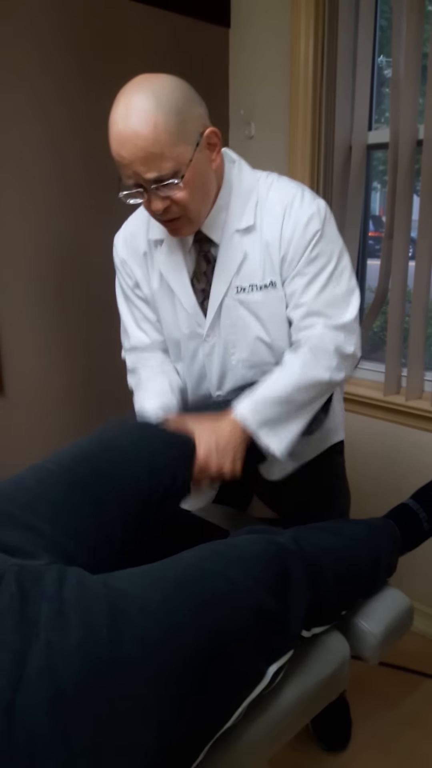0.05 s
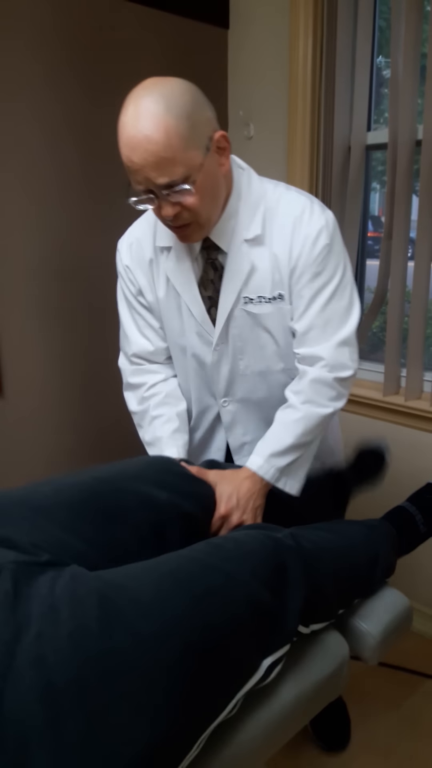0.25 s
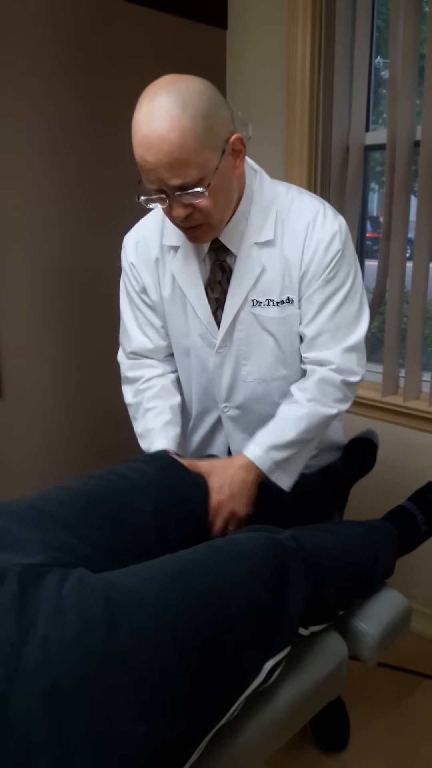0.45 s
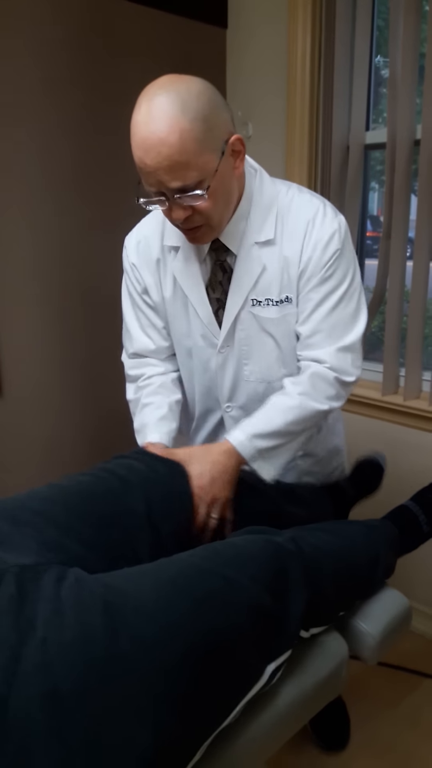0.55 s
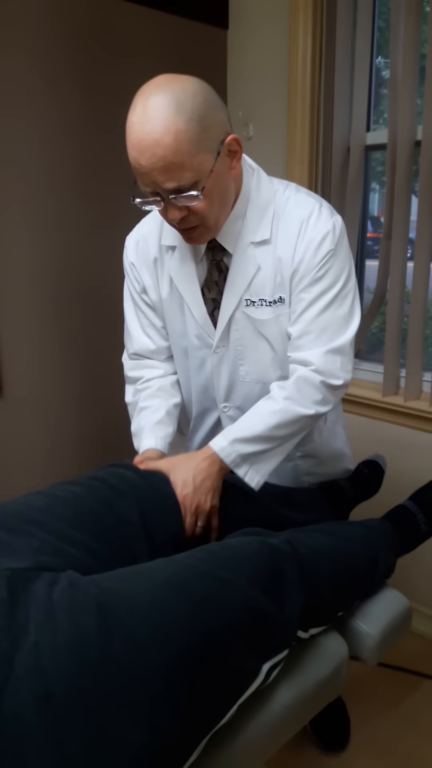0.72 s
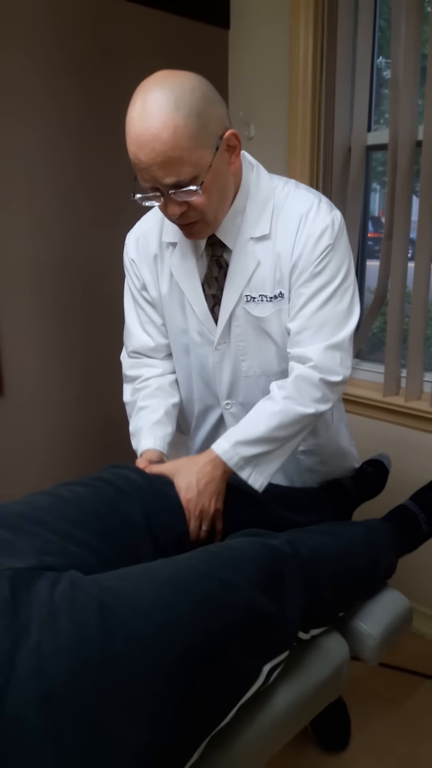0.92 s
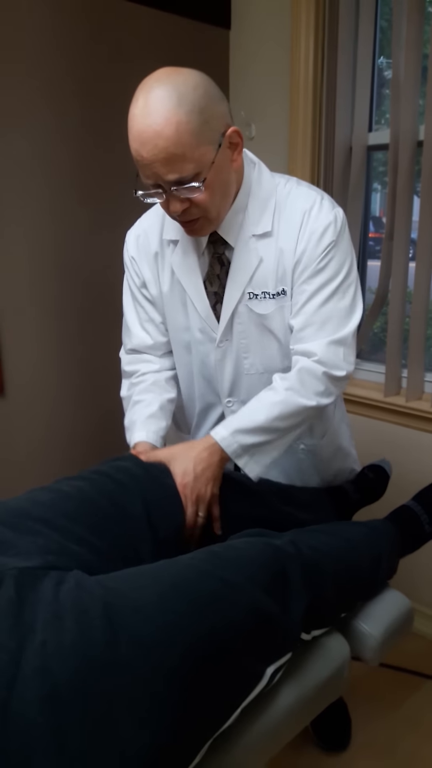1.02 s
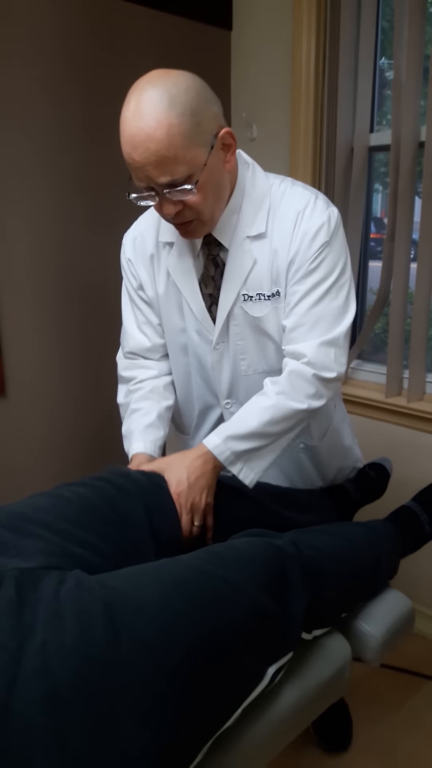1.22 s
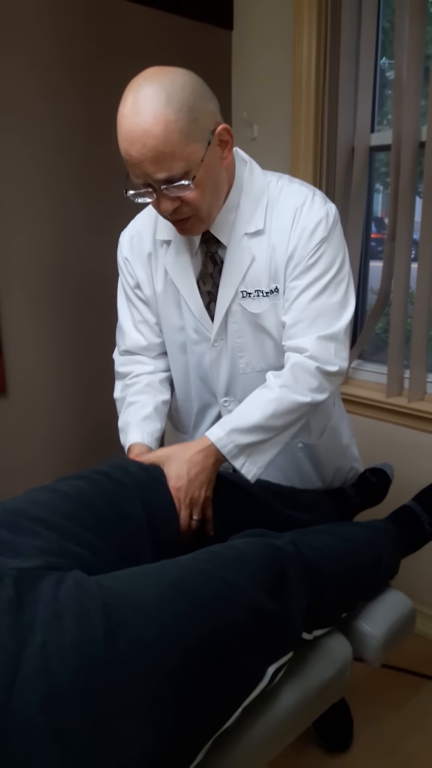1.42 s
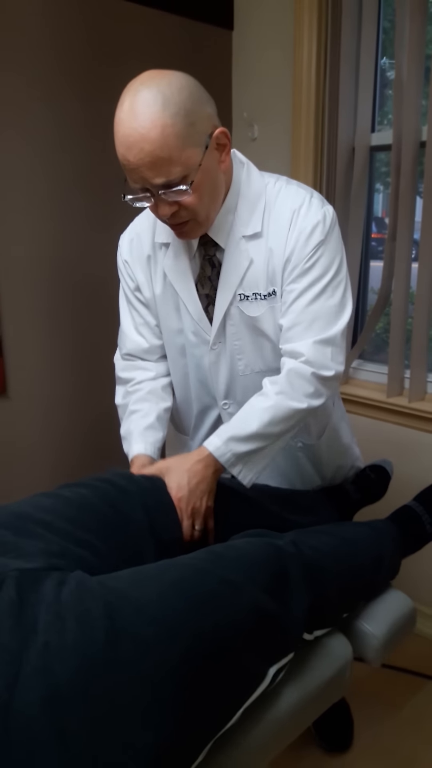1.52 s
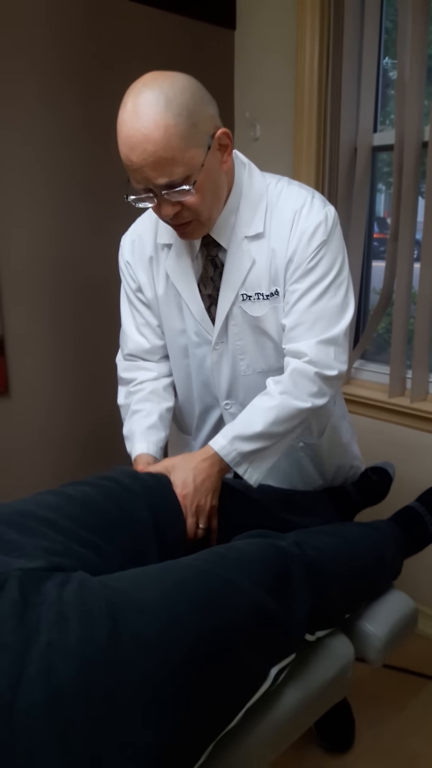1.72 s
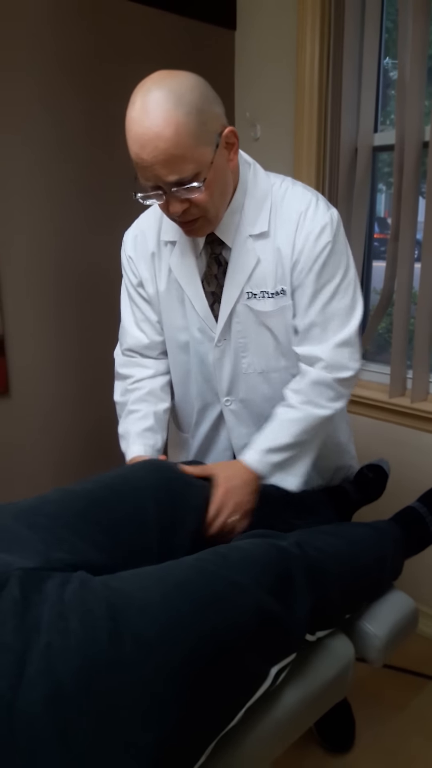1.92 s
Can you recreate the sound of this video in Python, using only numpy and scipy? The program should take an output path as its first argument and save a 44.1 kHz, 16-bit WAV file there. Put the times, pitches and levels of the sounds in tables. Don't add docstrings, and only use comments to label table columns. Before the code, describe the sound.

A treatment table section slips its catch with a quick thump and scrape, then lands with a loud hard clack that rings briefly in a small room, followed by faint knocks over dull ventilation hum.

```python
import sys
import numpy as np
from scipy import signal
from scipy.fft import rfft, irfft
from scipy.io import wavfile

SR = 44100
rng = np.random.default_rng(int(sys.argv[2]) if len(sys.argv) > 2 else 0)


def transcribe(signal):
    frames = np.atleast_2d(signal).T
    limited = np.clip(frames, -1, 1)
    pcm = np.round(limited * 32767).astype(np.int16)
    wavfile.write(sys.argv[1], SR, pcm)


def voltage_ratio(decibels):
    exponent = np.asarray(decibels, float) / 20
    return 10 ** exponent


N = 85995


def at_hz(points, hz):
    table_hz, value = np.transpose(points)
    return np.interp(np.log(hz), np.log(table_hz), value)


def rms_one(x):
    return x / np.sqrt(np.mean(x ** 2) + 1e-20)


def drift(rate_hz):
    r = np.exp(-2 * np.pi * rate_hz * 40 / SR)
    noise = rng.standard_normal(N // 40 + 2002)
    slow = signal.lfilter([1], [1, -2 * r, r * r], noise)[2000:]
    return np.interp(np.arange(N) / 40, np.arange(len(slow)), rms_one(slow))


def ring(push, hz, t60):
    r = voltage_ratio(-60 / (t60 * SR))
    w = 2 * np.pi * hz / SR
    return signal.lfilter([0, np.sin(w)], [1, -2 * r * np.cos(w), r * r], push + 1e-18)


def click(s, gain):
    out = np.zeros(N)
    np.add.at(out, (np.asarray(s) * SR).astype(int), gain)
    return out


# pitch in Hz, likeness as a share from 0 to 1.
LIKENESS = [(60, .99), (150, .995), (270, .85), (500, .5), (1000, .15), (2000, 0.01), (10000, .01)]
EDGES_HZ = 30 * 2 ** np.arange(0, 9.3, .5)


def bands(size, gain_at):
    out = 0
    white = rng.standard_normal((2, 2, size))
    for k, (low, high) in enumerate(zip(EDGES_HZ, EDGES_HZ[1:])):
        band = signal.butter(2, [low, high], "band", fs=SR, output="sos")
        mid, side = signal.sosfilt(band, white[k % 2])
        hz = np.sqrt(low * high)
        alike = np.clip(at_hz(LIKENESS, hz), -1, 1)
        stereo = np.sqrt(1 + alike) * mid + np.sqrt(1 - alike) * side * [[1], [-1]]
        out = out + gain_at(hz) * stereo
    return out


def burst(s, db, t60, colour, rise_s=.0002):
    t = np.arange(8192) / SR
    spectrum = rfft(rng.standard_normal(8192) * voltage_ratio(-60 * t / t60))
    hz = np.maximum(np.arange(len(spectrum)) * SR / 8192, 20)
    puff = irfft(spectrum * colour(hz))
    rise = np.minimum(t[:4096] / rise_s, 1)
    out, i = np.zeros(N), int(s * SR)
    out[i:i + 4096] = voltage_ratio(db) * puff[:4096] / np.abs(puff).max() * rise
    return out


# pitch in Hz, rms level in dB.
FAN = [
    (92, -10.5),
    (197.5, -10),
    (245, -10),
]


def fan():
    wander_hz, swell_db = 2.5, 2.5
    out = 0
    for hz, db in FAN:
        level = voltage_ratio(db + 3 + swell_db * drift(2.5))
        cycles = np.cumsum(hz + wander_hz * drift(3.0)) / SR
        out = out + level * np.sin(2 * np.pi * cycles)
    return out


# time in seconds, level in dB, extra treble in dB.
OPENING = [(0, 12, 17), (.06, 9.5, 14), (0.148, 8.5, 11.5), (.32, 8, 12), (.44, 5, 12.5), (.54, 2.5, 12),
           (.67, 2.5, 13), (.73, 2.5, 4.5), (.88, 1.5, 3.5), (.95, .3, 1.2), (1.47, .8, 2.4),
           (1.56, 2.5, 1), (1.6, 6.5, 4.5), (1.75, 6.5, 5), (1.95, 7, 6)]
# pitch in Hz, level in dB per Hz.
AIR = [(40, -24), (95, -9), (250, -4.5), (630, -8), (2300, -31), (3800, -48), (6500, -43), (10000, -51)]
# pitch in Hz, width in Hz, level in dB.
DUCT = [(92, 12, -5), (197, 6, -11), (245, 6, -10), (520, 30, -13), (620, 30, -13)]


def ventilation():
    air_db, bright_from_hz, bright_per_octave = -57.5, 440, .27
    s, level_db, treble_db = np.transpose(OPENING)
    t = np.arange(N) / SR
    level = np.interp(t, s, level_db)
    treble = np.interp(t, s, treble_db)
    together = drift(3.0)

    def air_gain(hz):
        share = np.clip(bright_per_octave * np.log2(hz / bright_from_hz), 0, 1)
        return voltage_ratio(at_hz(AIR, hz) + treble * share + .6 * together + 1.5 * drift(6.7))

    air = rms_one(bands(N, air_gain))
    hum = 0
    for hz, width, db in DUCT:
        t60 = np.log(1000) / np.pi / width
        hum = hum + voltage_ratio(db) * rms_one(ring(rng.standard_normal(N), hz, t60))
    return voltage_ratio(air_db + level) * (air + hum + fan())


# start in seconds, level in dB, pitch in Hz, ring time (60 dB fall) in seconds.
KNOCKS = [(.009, -29.5, 795, .028), (.018, -33, 425, .1), (.012, -38, 1050, .06), (.012, -46, 2760, .03),
          (.014, -46, 1730, .03), (.016, -50, 2300, .03), (.011, -52, 4510, .03), (.013, -53, 5450, .03),
          (.012, -56, 6600, .02), (.458, -44, 1150, .022), (.461, -45, 620, .035), (.81, -63, 2000, .04),
          (.854, -59, 1800, .03), (.87, -62, 2150, .03), (1.1, -57.5, 2330, 0.025), (1.105, -59, 2050, .03),
          (1.15, -64, 1850, .08), (1.185, -47.5, 258, 0.053), (1.456, -54.5, 900, .03),
          (1.553, -42, 550, .025), (1.56, -54, 1600, .012), (1.5785, -39.5, 1225, .06),
          (1.586, -43, 1225, .05), (1.582, -61, 4570, .06), (1.585, -64, 6770, .04),
          (1.5755, -41, 834, .05), (1.579, -50, 2100, .03), (1.587, -50, 1880, .06),
          (1.595, -51, 2100, .05), (1.594, -45, 549, .1), (1.585, -45, 398, .1), (1.603, -46, 700, .04),
          (1.614, -47, 500, .04), (1.614, -55, 1900, .04), (1.59, -48, 242, .1), (1.705, -47, 230, .025),
          (1.819, -46, 265, .02), (1.84, -41, 231.5, .025)]


def knocks():
    out = 0
    for s, db, hz, t60 in KNOCKS:
        tap = click([s], voltage_ratio(db - 2))
        tick = voltage_ratio(-27) * signal.lfilter([1], [1, -.6], tap)
        out = out + ring(tap, hz, t60) + 0.42 * ring(tap, hz * 0.96, t60) + tick
    return out


LONGEST_RING_S = .1
# start in seconds, level in dB.
LATCH = [
    (0.173, -38),
    (0.1764, -33),
    (0.1803, -24),
    (.184, -31),
    (.1995, -28),
    (0.2015, -33),
]
# pitch in Hz, level in dB, ring time in seconds.
LATCH_MODES = [
    (215, 4, 0.035),
    (120, -30, 0.13),
    (1220, -13, .04),
    (2120, -16, .03),
    (4360, -9, 0.0079),
]


def latch():
    s, db = np.transpose(LATCH)
    out = 0
    for hz, level, t60 in LATCH_MODES:
        slips = click(s, voltage_ratio(db + level + rng.normal(0, 3, len(s))))
        out = out + ring(slips, hz, min(t60, LONGEST_RING_S))
    return out


# start in seconds, level in dB, hardness as the highest pitch struck in Hz.
LANDING = [
    (.2143, -16, 300),
    (.2175, -11, 4000),
    (.2222, -13, 9000),
    (.2245, -13, 9000),
    (.228, -13.5, 5000),
    (.240, -22.5, 7000),
]
# pitch in Hz, level in dB, ring time in seconds.
FRAME = [(112, -26, 0.24), (149, -16.5, 0.084), (194, -1, 0.6), (255, 3, 0.12), (360, -7, 0.1),
         (416.6, -6.5, 0.6), (509.4, -6.5, 0.35), (577.5, -3, .25), (636, -1, 0.1), (723, -1, .2),
         (834, -14, .15), (945.7, -2, .15), (1206, -9.5, 0.3), (1400, -3, 0.083)]
# pitch in Hz, level in dB per Hz.
CLACK = [(90, -36), (220, 2), (600, 0), (1600, -6), (3100, -12), (4000, -28), (6500, -18), (14000, -21)]


def landing():
    blow_s = .2175
    thwack = ring(click([blow_s], -voltage_ratio(-3.5)), 620, .012)
    slap = ring(click([blow_s], voltage_ratio(-16)), 1500, .03)
    out = thwack + slap
    for s, db, hard_hz in LANDING:
        softness = signal.butter(2, hard_hz, fs=SR)
        push = signal.lfilter(*softness, click([s], -voltage_ratio(db - 10.5)))
        for hz, level, t60 in FRAME:
            out = out + voltage_ratio(level + rng.normal(0, 2.8)) * ring(push, hz, min(t60, LONGEST_RING_S))

        def clack_colour(hz):
            return voltage_ratio(at_hz(CLACK, hz)) / np.hypot(1, (hz / hard_hz) ** 2)

        out = out + burst(s, db + 0.5, .008, clack_colour, .4 / hard_hz)
    snap = burst(.2217, -12, .012, lambda hz: np.exp(-((hz - 12900) / 3300) ** 2))
    return out + snap


def thud():
    return ring(click([.2176], voltage_ratio(-11)), 225, .09)


# pitch in Hz, level in dB, ring time in seconds.
LONG_RING = [(111, -30, .35), (157, -24, .3), (194, -20, .26), (264, -21, .3), (297, -23, .35),
             (360, -21, .32), (414, -21, .32), (466, -27, .3), (513, -21, .3), (571, -22, .35),
             (588, -23, .35), (636, -20, .33), (709, -23, .3), (837, -20, .3),
             (942, -23, .25), (1007, -28, .3), (1107, -27, .3), (1223, -25, .25), (1297, -21, .12),
              (1345, -25, .2), (1443, -28, .2), (1750, -20, .1), (1981, -33, .3), (2143, -32, .25),
              (2350, -23, .1), (2417, -35, .2), (2972, -36, .3)]


def rings():
    start_s, build_s, spread = .218, .004, 1.1
    t = np.maximum(np.arange(N) / SR - start_s, 0)
    out = 0
    for hz, db, t60 in LONG_RING:
        phase = rng.uniform(0, 2 * np.pi)
        apart = spread * rng.uniform(-1, 1) * (1 - at_hz(LIKENESS, hz))
        angle = 2 * np.pi * hz * t + phase + apart * np.array([[1], [-1]])
        out = out + voltage_ratio(db - 60 * t / t60) * np.sin(angle)
    return out * (1 - np.exp(-t / build_s))


# pitch in Hz, time to fall 60 dB in seconds.
ROOM_T60 = [(80, 0.15), (200, .3), (600, .3), (2000, 0.28), (8000, .28)]


def room(x):
    room_db, onset_s, build_s = -2.5, 0.0011, 0.0079
    t = np.arange(SR) / SR
    rise = np.clip((t - onset_s) / build_s, 0, 1)
    tail = rise * bands(SR, lambda hz: voltage_ratio(-60 * t / at_hz(ROOM_T60, hz)))
    tail = voltage_ratio(room_db) * tail / np.sqrt(np.mean(np.sum(tail ** 2, axis=1)))
    direct = x * voltage_ratio(np.array([[.4], [-.4]]))
    return direct + signal.fftconvolve(x[None], tail, axes=1)[:, :N]


def wash(s, db, build_s, hold_s, colour):
    t = np.arange(SR // 2) / SR

    def gain(hz):
        build = np.clip(t / (build_s + 1.2 / hz), 0, 1)
        fall_db = 60 * np.maximum(t - hold_s, 0) / at_hz(ROOM_T60, hz)
        return np.sin(np.pi / 2 * build) ** 2 * voltage_ratio(at_hz(colour, hz) - fall_db)

    tail = bands(len(t), gain)
    out, i = np.zeros((2, N + SR)), int(s * SR)
    out[:, i:i + len(t)] = voltage_ratio(db) * tail / np.sqrt(np.mean(tail[:, :1024] ** 2))
    return out[:, :N]


# pitch in Hz, level in dB per Hz.
LATCH_COLOUR = [(70, -30), (210, -2), (600, -14), (1200, -9), (2500, -14), (4000, -25), (6800, -21),
                (9500, -34)]
# pitch in Hz, level in dB per Hz.
FIRST_COLOUR = [(100, -14), (420, -7), (900, -8), (2700, -16), (3600, -25), (6500, -23), (10000, -50),
                (14500, -29)]
# pitch in Hz, level in dB per Hz.
LATE_COLOUR = [(150, -14), (500, -6), (900, -8), (1400, -16), (2100, -21), (3500, -38), (6500, -35),
               (10000, -52)]


def washes():
    out = wash(.2175, -16, .003, .03, CLACK)
    out = out + wash(.172, -29, .002, .015, LATCH_COLOUR)
    out = out + wash(.007, -42, .003, .02, FIRST_COLOUR)
    return out + wash(1.576, -49, .003, .012, LATE_COLOUR)


def scene():
    table = room(knocks() + latch() + landing())
    return ventilation() + table + washes() + rings() + thud()


def roll_off(x):
    return signal.sosfilt(signal.butter(12, 16970, fs=SR, output="sos"), x)


# time in seconds, level in dB.
TOP_OPEN = [(0, 5), (.04, 2), (.06, 0), (.175, -8), (.179, 3), (.194, 1), (.198, -9), (.214, -9), (.217, 3),
            (.226, 1), (.235, -3), (.4, -3), (.5, 4), (.68, 4), (.72, -3), (1.95, -1)]


def record(dry):
    dry = signal.sosfilt(signal.butter(4, 66, "high", fs=SR, output="sos"), dry)
    dry = signal.sosfilt(signal.butter(10, 15900, fs=SR, output="sos"), dry)
    low = signal.sosfilt(signal.cheby2(10, 40, 8500, fs=SR, output="sos"), dry)
    top = signal.sosfilt(signal.cheby2(10, 40, 7850, "high", fs=SR, output="sos"), dry)
    top_db = -5 + np.interp(np.arange(N) / SR, *np.transpose(TOP_OPEN))
    x = low + voltage_ratio(top_db) * top
    mix = 1.335 * np.tanh(x / 1.26)
    return roll_off(mix)


dry = scene()
out = record(dry)
transcribe(out)
```